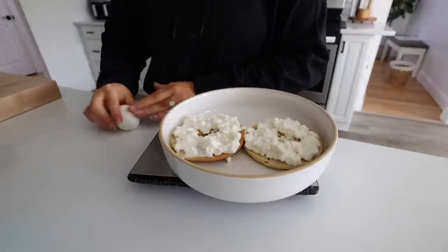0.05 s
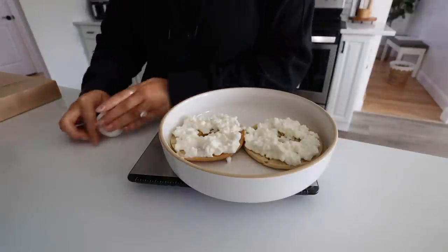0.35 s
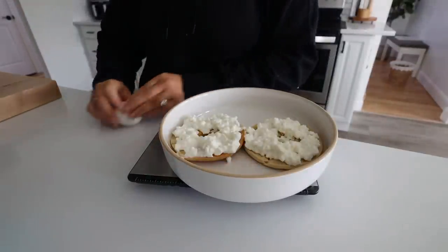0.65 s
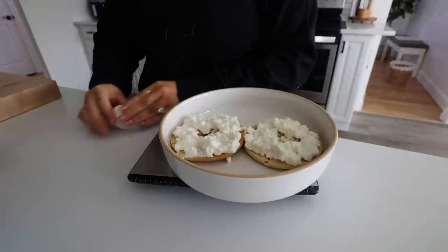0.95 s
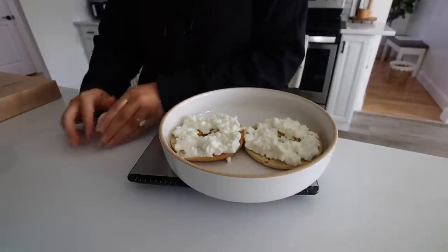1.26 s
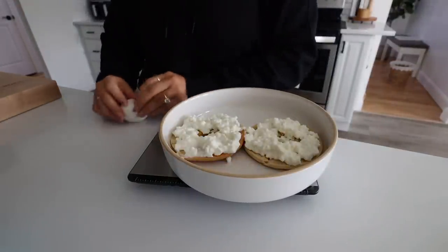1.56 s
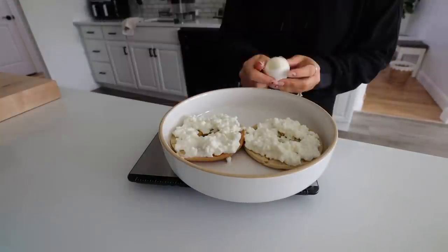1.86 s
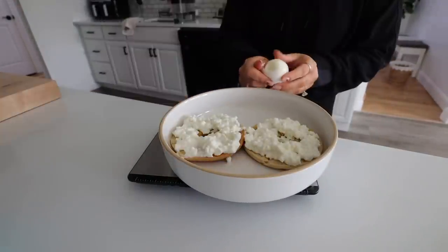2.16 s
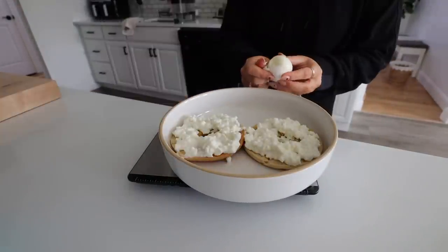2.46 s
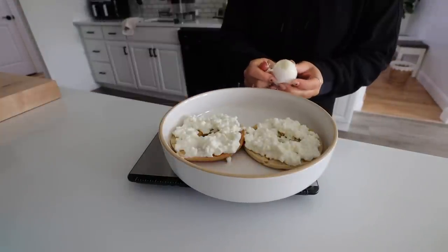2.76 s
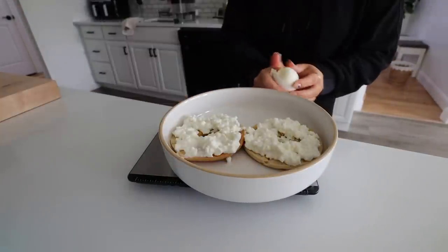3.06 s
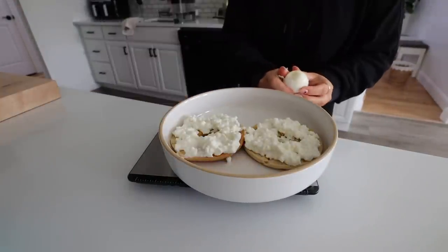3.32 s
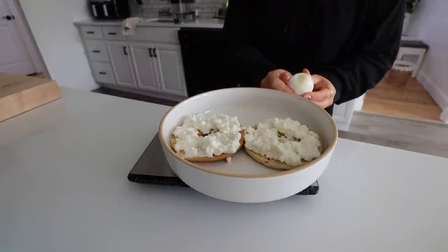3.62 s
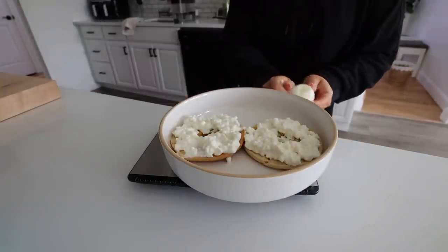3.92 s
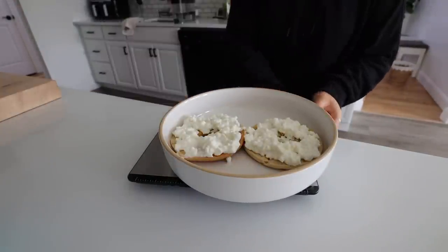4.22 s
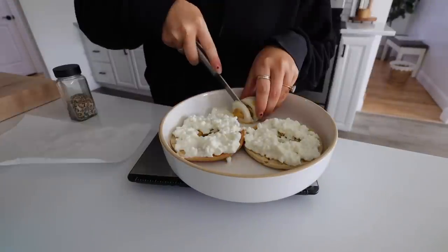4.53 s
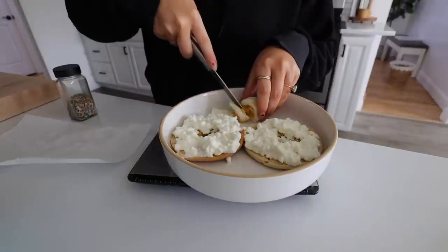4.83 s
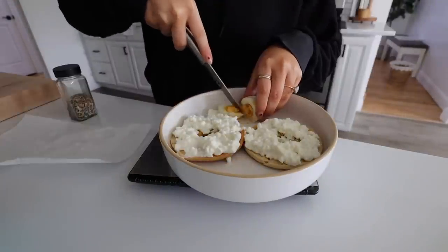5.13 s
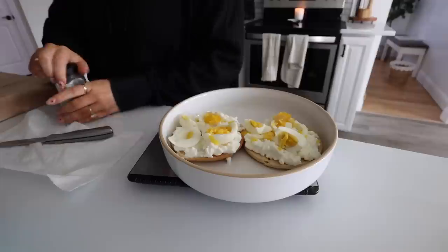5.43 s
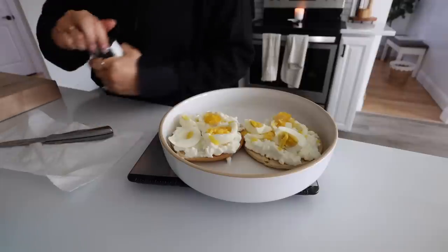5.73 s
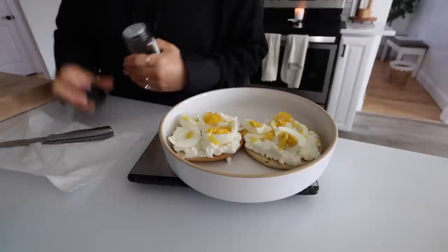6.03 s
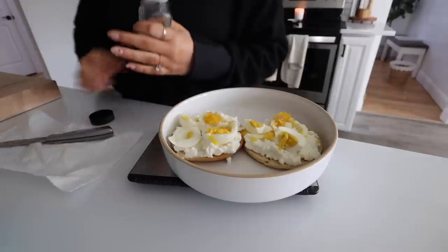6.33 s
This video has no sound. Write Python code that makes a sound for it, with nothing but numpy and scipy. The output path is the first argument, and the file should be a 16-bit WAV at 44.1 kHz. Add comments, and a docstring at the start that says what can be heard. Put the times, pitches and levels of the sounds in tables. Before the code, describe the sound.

Heard close up in a faintly humming kitchen, an eggshell crunches against the counter in two bursts, followed by light taps. Fingers pick the shell away with delicate crackles and damp little squelches. Then come several loud, ringing clinks as a knife cuts the egg against a stoneware bowl. Finally a jar is unscrewed with a brief squeak and plastic clicks, and its lid is set down hard, rattling briefly.

```python
"""Peeling and cutting a boiled egg

A boiled egg is rolled on a kitchen counter until its shell crackles, then tapped and peeled by hand.
The knife cutting it strikes a stoneware bowl; blade and bowl ring. A spice jar's lid squeaks on its
thread and is set down hard. A close stereo microphone hears it over a faint room hum."""
import sys
import numpy as np
from scipy import signal
from scipy.fft import rfft, irfft, next_fast_len
from scipy.io import wavfile
from scipy.ndimage import uniform_filter1d

SR = 44100
rng = np.random.default_rng(int(sys.argv[2]) if len(sys.argv) > 2 else 0)


def generate_wav(sig):
    """Save sig (samples, or channels by samples) to the path in sys.argv[1] as 16-bit PCM at SR."""
    pcm = np.round(np.clip(np.atleast_2d(sig).T, -1, 1) * 32767).astype(np.int16)
    wavfile.write(sys.argv[1], SR, pcm)


N = 290222

# spectrum of a small brittle snap: freq_hz, gain_db
SNAP_SPECTRUM = [(300, -39), (1500, -0.5), (2800, -11), (3800, -9), (6500, 4.5), (9000, 3), (11000, -11),
                 (14000, -8), (16000, -22)]


def amp(db):
    """Decibels to gain."""
    return 10 ** (np.asarray(db) / 20)


def unit_rms(x):
    """Scales to rms 1."""
    return x / np.sqrt(np.mean(x ** 2) + 1e-20)


def curve_at(points, hz):
    """Interpolates on a log-frequency axis."""
    freq_hz, value = np.transpose(points)
    return np.interp(np.log(hz + 1), np.log(freq_hz), value)


def add(mix, start_s, sound):
    """Mixes a sound in at start_s."""
    part = mix[..., max(round(start_s * SR), 0):][..., :sound.shape[-1]]
    part += sound[..., :part.shape[-1]]


def colour(x, spectrum, tilt_db_oct=0, size=4096):
    """Minimum-phase filter with a given spectrum, tilted above 2 kHz."""
    hz = abs(np.fft.fftfreq(size, 1 / SR))
    octaves = np.log2(1 + (hz / 2000) ** 2) / 2
    log_gain = np.log(amp(curve_at(spectrum, hz) + tilt_db_oct * octaves))
    taps = np.fft.ifft(np.exp(np.conj(signal.hilbert(log_gain)))).real
    return signal.oaconvolve(x, taps[:size // 2])[:len(x)]


def contact(spectrum, level_db, tilt_db_oct, chatter_s, chatter, size=6000):
    """One sharp push and a dying chatter of tiny contacts, in the colour of the object."""
    push = rng.standard_normal(size) * np.exp(-np.arange(size) / SR / max(chatter_s, 1e-4))
    push *= chatter / np.linalg.norm(push)
    push[0] += 1
    x = colour(push, spectrum, tilt_db_oct)
    crest = 2 * np.sqrt(uniform_filter1d(x ** 2, size=100).max())  # twice the loudest 2 ms rms
    return amp(level_db) * x / crest


def crackle(rate_hz, spread_db, size=N):
    """A random train of tiny fractures or slips of unequal strength."""
    strength = amp(spread_db * np.minimum(rng.exponential(1, size), 3))
    return strength * rng.choice([-1, 1], size) * (rng.random(size) < rate_hz / SR)


def mode(t, hz, level_db, t60_s, phase_rad=0):
    """A decaying sine."""
    return amp(level_db - 60 * t / t60_s) * np.sin(2 * np.pi * hz * t + phase_rad)


def arch(start_s, length_s, power=0.17):
    """A stroke that swells and fades: half a sine, raised to a power."""
    phase = np.clip((np.arange(N) / SR - start_s) / length_s, 0, 1)
    return np.sin(np.pi * phase) ** power


def effort(peak_s, build_s, release_s):
    """Force grows steadily until peak_s, then lets go."""
    t = np.arange(N) / SR - peak_s
    return np.clip(1 + t / build_s, 0, 1) * np.exp(-np.maximum(t, 0) / release_s)


def place(x, pan_db, lag_ms):
    """Sound from the left reaches the right channel later and weaker."""
    size = next_fast_len(N + SR // 100, True)
    delay = np.exp(-2j * np.pi * np.fft.rfftfreq(size, 1 / SR) * lag_ms / 1000)
    late = irfft(rfft(x, size) * delay, size)[:N]
    return np.array([x * amp(pan_db / 2), late * amp(-pan_db / 2)])


def diffuse(mid, side):
    """Sound from all around: mono in the bass, wide in the treble."""
    # stereo width: freq_hz, side_gain_db
    width = [(25, -30), (60, -27), (200, -15.5), (500, -6.5), (1000, -5), (2200, -4.5), (3500, 6),
             (6000, 5.5), (9000, 9.5), (14000, 9.5)]
    side = colour(side, width)
    return np.array([mid + side, mid - side])


def kitchen(x, wet_db, build_s=0.0012):
    """Reflections build up, then each band dies at its own speed."""
    # room decay: freq_hz, t60_s
    decay_times = [(150, 0.47), (600, 0.61), (2200, 0.48), (5000, 0.29), (12000, 0.029)]
    hz, t, bands = signal.stft(rng.standard_normal((2, SR * 3 // 4)), SR, nperseg=256)
    bands *= amp(-60 * t / curve_at(decay_times, hz)[:, None])
    tails = signal.istft(bands * (1 - np.exp(-t / build_s)), SR, nperseg=256)[1]
    mid, side = (signal.fftconvolve(x, tail / np.linalg.norm(tail))[:N] for tail in tails)
    return amp(wet_db) * diffuse(mid, side)


def room_tone(air_db=-46.5, loud_from_s=1.66, loud_until_s=5.68):
    """Steady air noise and the wavering hum of kitchen appliances, louder for a stretch."""
    # air noise: freq_hz, gain_db
    air_spectrum = [(20, -8), (55, -1.5), (230, 0.5), (300, -3), (410, -9.5), (620, -9.5), (1030, -14.5),
                    (2300, -16.5), (3300, -22.5), (4500, -29.5), (7000, -36.5), (12000, -53), (14000, -55),
                    (16000, -84)]
    # appliance hum: pitch_hz, base_db
    hum_tones = [(59.2, -60), (183, -67.5)]
    mid, side = (amp(air_db) * unit_rms(colour(rng.standard_normal(N), air_spectrum)) for _ in range(2))
    t, hum = np.arange(N) / SR, np.zeros(N)
    for hz, db in hum_tones:
        drift = np.interp(t, np.linspace(0, N / SR, 30), rng.standard_normal(30))
        hum += np.sqrt(2) * amp(db + 2 * drift) * np.sin(2 * np.pi * hz * t + drift[::-1] / 2)
    boost_db = np.where((t > loud_from_s) & (t < loud_until_s), 7.5, -3)
    return diffuse(mid, side) + hum * uniform_filter1d(amp(boost_db), size=2000)


def shard(spectrum, ripple_db=1.5):
    """No two fragments sound alike: a spectrum with random ripples."""
    hz, db = np.transpose(spectrum)
    return np.transpose([hz, db + ripple_db * rng.standard_normal(len(hz))])


def eggshell(hollow_db, hollow_below_hz=1000):
    """Spectrum of one crack: a shell fragment over the egg's hollow knock."""
    # cracking shell: freq_hz, gain_db
    shell_spectrum = [(100, -17.5), (450, -7), (850, 5.5), (1150, -2.5), (1750, 10), (2250, -3),
                      (3200, -3.5), (4300, -12), (6500, -7.5), (9000, -7.5), (12000, -24), (16000, -46)]
    hz, db = shard(shell_spectrum).T
    return np.transpose([hz, db + hollow_db * (hz < hollow_below_hz)])


def rolling_and_tapping(crunch_db=-9, rumble_db=-12, crumble_db=-25, crumble_t60_s=0.1):
    """The shell cracks and crumbles under the palm, then is tapped; both thump the counter."""
    # loudest cracks: start_s, level_db, thump_db, hollow_db
    cracks = [(.027, -18, -25, 8), (.090, -18, -28.5, -0.5), (.098, -21.5, -24, 7), (.125, -23, -26.5, 2),
              (.186, -19.5, -49, 3), (.206, -20, -29, 1), (0.222, -23, -36, 3), (.231, -14.5, -24, 3),
              (.278, -17.5, -30, 3), (.299, -18, -36, 3.5), (.322, -24, -31, 1), (.373, -26, -50, -7),
              (.406, -17.5, -31.5, 3), (.853, -21.5, -43, -11), (.863, -20.5, -52, -2),
              (.881, -25, -23.5, -1), (.891, -25, -28.5, -2), (.930, -21.5, -29, -2), (0.932, -18, -34, -4),
              (.964, -18.5, -34, -8), (.974, -13.5, -22, 0), (1.0113, -16, -25, -2),
              (1.074, -16.5, -30, -1), (1.1111, -21.5, -38, 2), (1.138, -22, -31, -1),
              (1.158, -18.5, -23, -2), (1.179, -21.5, -31, -2), (1.2, -28.5, -39, -3)]
    # egg tapped on the counter: start_s, level_db, tilt_db_oct, thump_db
    taps = [(1.511, -30.5, -3.5, -53), (1.612, -30.5, 2, -18), (1.788, -23.5, -0.5, -25.5)]
    # counter slab: pitch_hz, level_db, t60_s
    counter_modes = [(84, -26.5, 0.04), (154.3, 4.5, 0.061), (202.7, -3, 0.077), (266.7, -11.5, 0.092)]
    # pushes of the palm: start_s, length_s, level_db
    rolls = [(-.03, 0.1, -32.5), (0.074, 0.095, -30), (0.187, 0.055, -31.5), (0.848, 0.058, -29),
             (0.913, 0.11, -32)]
    shell, pushes, crumbling = np.zeros((3, N))
    t = np.arange(SR // 4) / SR
    for start_s, db, thump_db, hollow_db in cracks:
        tilt_db_oct = -0.1 - 0.39 * (db + 15)  # stronger cracks are duller
        add(shell, start_s, contact(eggshell(hollow_db), db, tilt_db_oct, chatter_s=0.0038, chatter=1.5))
        add(crumbling, start_s, amp(db - 60 * t / crumble_t60_s))
        add(pushes, start_s, amp([thump_db]))
    for start_s, db, tilt_db_oct, thump_db in taps:
        tap = contact(eggshell(hollow_db=5.5), db, tilt_db_oct, chatter_s=0.0048, chatter=1.43)
        add(shell, start_s, tap)
        add(pushes, start_s, amp([thump_db]))
    slab = sum(mode(t, hz, db, t60_s) for hz, db, t60_s in counter_modes)
    slab *= 1 - np.exp(-t / 0.0028)
    pressure = sum(amp(db) * arch(start_s, length_s, power=0.18) for start_s, length_s, db in rolls)
    grains = crackle(rate_hz=2200, spread_db=4.5)
    crunch = unit_rms(colour(grains, eggshell(hollow_db=-2), tilt_db_oct=-0.5))
    shell += (amp(crunch_db) * pressure + amp(crumble_db) * crumbling) * crunch
    thumps = signal.oaconvolve(pushes, slab / abs(slab).max())[:N]
    thumps += amp(rumble_db) * pressure * unit_rms(signal.oaconvolve(grains, slab)[:N])
    # the shell's room echo has less 1.8 kHz ring and top treble
    room_send = colour(shell, [(1300, 5), (1800, -2), (2400, 8.5), (7000, -2)])
    direct = place(shell, pan_db=5, lag_ms=0.053) + thumps
    return direct + kitchen(room_send, wet_db=-14) + kitchen(thumps, wet_db=-10)


def peeling(tear_db=-3, rub_db=-6):
    """Membrane tears in a fine crackle, fingers rub and slip, and shell pieces snap or rasp off."""
    # pulls on the shell: peak_s, build_s, membrane_db, finger_db
    pulls = [(1.94, 0.081, -52, -50), (2.45, 0.12, -44.5, -47.5), (2.56, 0.026, -54, -46),
             (2.65, 0.038, -50, -52), (2.98, 0.29, -59.5, -73), (3.07, 0.046, -52, -49.5),
             (3.17, 0.016, -57, -48), (3.305, 0.096, -52.5, -53), (3.43, 0.096, -55.5, -58),
             (3.66, 0.046, -46.5, -46), (3.86, 0.036, -57, -45), (4.35, 0.1, -56, -44.5)]
    # damp membrane lifting: start_s, length_s, level_db
    lifts = [(2.75, 1, -70), (3.58, 0.035, -63), (3.633, 0.039, -57)]
    # its bright crackle: freq_hz, gain_db
    sticky_spectrum = [(2000, -29), (7000, 0), (10000, -8), (12000, -3), (14500, -6), (16000, -17.5)]
    # fingers on shell: freq_hz, gain_db
    rub_spectrum = [(300, -34), (1200, -4), (2200, 4), (2800, -4.5), (3600, -3), (4800, -10.5), (9000, -22)]
    # pieces snapping off: start_s, level_db
    breaks = [(2.257, -45), (2.404, -44), (2.448, -28), (2.629, -39.5), (2.722, -39.5), (2.977, -35),
              (2.986, -30.5), (3.0597, -34.5), (3.3123, -32), (3.508, -40.5), (3.591, -36.5), (3.639, -35),
              (3.647, -43), (3.8029, -40.5)]
    # wet fingers on bare egg: start_s, level_db, decay_s, pitch_hz
    slips = [(2.45, -32, 0.013, 2020), (3.059, -31, 0.008, 2700), (3.413, -36, 0.013, 2460),
             (3.662, -29, 0.017, 2120), (3.848, -31.5, 0.029, 2240), (3.918, -33, 0.018, 2230),
             (3.998, -34, 0.03, 2070), (4.122, -29, 0.024, 2050), (4.219, -31, 0.015, 2120),
             (4.27, -34.5, 0.034, 2220), (4.333, -31, 0.01, 2190)]
    # shell strip rasping away: start_s, length_s, level_db, first_hz, last_hz
    rasp = [(2.34, 0.11, -47.5, 3300, 2590)]
    tearing, rubbing, snaps = np.zeros((3, N))
    for peak_s, build_s, membrane_db, finger_db in pulls:
        force = effort(peak_s, build_s, release_s=0.03)
        tearing += amp(membrane_db) * force
        rubbing += amp(finger_db) * force
    fractures = [crackle(rate_hz=70, spread_db=4.5) for _ in range(6)]
    fibres = sum(colour(train, shard(SNAP_SPECTRUM), tilt_db_oct=-3) for train in fractures)
    membrane = amp(tear_db) * tearing * unit_rms(fibres)
    lifting = sum(amp(db) * arch(start_s, length_s) for start_s, length_s, db in lifts)
    membrane += lifting * unit_rms(colour(crackle(rate_hz=500, spread_db=3.5), sticky_spectrum))
    fingers = amp(rub_db) * rubbing * unit_rms(colour(crackle(rate_hz=900, spread_db=3), rub_spectrum))
    for start_s, db in breaks:
        snap = contact(shard(SNAP_SPECTRUM), db, tilt_db_oct=1, chatter_s=0.0008, chatter=0.7)
        add(snaps, start_s, snap)
    for start_s, db, decay_s, pitch_hz in slips:
        add(fingers, start_s, finger_slip(db, decay_s, pitch_hz))
    hands = membrane + fingers + stick_slip(rasp, width_hz=1300)
    room_send = hands + amp(-1) * snaps
    return place(hands + snaps, pan_db=2, lag_ms=-0.025) + kitchen(room_send, wet_db=-9)


def resonate(x, hz, width_hz):
    """A resonance whose centre follows the curve hz."""
    carrier = np.exp(2j * np.pi * np.cumsum(hz) / SR)
    pole = np.exp(-np.pi * width_hz / SR)
    return 2 * (carrier * signal.lfilter([1 - pole], [1, -pole], x / carrier)).real


def stick_slip(glides, width_hz):
    """Tiny slips feed a gliding resonance: a rasp if wide, a squeak if narrow."""
    out = np.zeros(N)
    for start_s, length_s, db, first_hz, last_hz in glides:
        pitch_hz = np.interp(np.arange(N) / SR, [start_s, start_s + length_s], [first_hz, last_hz])
        slips = crackle(rate_hz=2900, spread_db=2)
        tone = resonate(resonate(slips, pitch_hz, width_hz), pitch_hz, 2 * width_hz)
        out += amp(db) * arch(start_s, length_s) * unit_rms(tone)
    return out


def finger_slip(level_db, decay_s, pitch_hz):
    """A wet fingertip lets go at once and chatters to rest."""
    # squelch, its 2150 Hz peak moved to pitch_hz below: freq_hz, gain_db
    squelch = [(500, -22), (1600, -10), (2150, 6), (2500, -3), (2900, -12.5), (3600, -8.5), (5000, -27),
               (12000, -35.5)]
    t = np.arange(SR // 4) / SR
    spectrum = [(hz * pitch_hz / 2150, db) for hz, db in squelch]
    slips = crackle(rate_hz=1200, spread_db=2.5, size=len(t))
    chatter = unit_rms(colour(slips, spectrum)) / np.pi  # peaks near 1
    return amp(level_db) * chatter * np.minimum(t / 0.002, 1) * np.exp(-t / decay_s)


def knife_on_bowl(chime_hz=3520, ping_hz=4940, uneven_db=2, grit_db=-3, lag_ms=0.048, stop_s=5.297):
    """The blade knocks, rebounds and drags on the bowl; both ring, and all stops short at stop_s."""
    # blows, varying with grip and landing place: start_s, knock_db, tilt_db_oct, ring_db,
    # blade_db, blade_hz, thud_db, thud_hz, chime_db, ping_db
    blows = [(4.5347, -2.5, -3.5, -23.5, -19, 2244, -20, 648, 2, -1),
             (4.539, -5, 2, -26, -25, 2216, -22, 559, 4.5, -1),
             (4.6008, -15, 0.5, -37, -33, 2280, -41.5, 630, 7, 1),
             (4.816, -1, -2.5, -19, -12, 2326, -22, 623, 2, 4.5),
             (4.8203, -6.5, -2, -23, -28, 2322, -35, 654, -4, 1),
             (4.876, -13, 6.5, -37, -25, 2280, -24, 556, 8, -1),
             (5.004, -2.5, 5, -18.5, -14.5, 2336, -20.5, 642, 0, -7),
             (5.0099, -4, 6, -39, -40, 2330, -42, 684, 4, 0),
             (5.129, -23, 5.5, -35, -22.5, 2232, -28, 672, 4, 1),
             (5.153, -23, -0.5, -33, -18.5, 2232, -42, 658, 1.5, 6)]
    # stoneware bowl: pitch_hz, level_db, t60_s
    bowl_modes = [(649, -15, 0.08), (1166, -5.5, 0.13), (1418, -11.5, 0.088), (1640, -14, 0.15),
                  (1865, -5.5, 0.061), (2540, -14, 0.17), (2160, -13, 0.087), (2270, -1.5, 0.2),
                  (3023, -18, 0.14), (3500, -20.5, 0.26), (3543, -16.5, 0.21), (4933, -16, 0.076),
                  (4920, -14, 0.13), (6570, -20, 0.058), (6920, -27, 0.1), (8560, -22, 0.065)]
    # blade hitting stoneware: freq_hz, gain_db
    knock_spectrum = [(150, -39), (430, -13.5), (620, -0.5), (900, -2), (1200, 7), (1550, 0.5), (1820, 6),
                      (2400, 2.5), (2750, -12.5), (3400, -5), (4000, -27), (6500, -25.5), (9000, -36.5),
                      (16000, -83)]
    # blade dragging on glaze: peak_s, build_s, level_db
    drags = [(4.653, 0.032, -40), (4.871, 0.012, -33.5), (5.05, 0.048, -33), (5.159, 0.054, -33),
             (5.249, 0.017, -39.5), (5.29, 0.015, -45)]
    # slips are softer than blows: freq_hz, gain_db
    drag_spectrum = [(2500, -0.5), (5000, -8.5), (8000, -13)]
    knocks, blade, ring = np.zeros(N), np.zeros(N), np.zeros((2, N))
    t = np.arange(SR // 2) / SR
    hz, mode_db, t60_s = np.transpose(bowl_modes)[:, :, None]
    onset = 1 - np.exp(-(t / 0.0008) ** 2)
    in_chime, in_ping = abs(hz - chime_hz) < 200, abs(hz - ping_hz) < 200  # two clearest mode pairs
    lead_rad = np.pi * hz * lag_ms / 1000
    for (start_s, knock_db, tilt_db_oct, ring_db,
         blade_db, blade_hz, thud_db, thud_hz, chime_db, ping_db) in blows:
        add(knocks, start_s, contact(knock_spectrum, knock_db, tilt_db_oct, chatter_s=.005, chatter=.7))
        add(knocks, start_s, onset * mode(t, thud_hz, thud_db, t60_s=0.06))
        # chatter against the glaze roughens the blade's ring
        wobble_rad = 0.35 * signal.resample(rng.standard_normal(70), len(t))
        add(blade, start_s, onset * mode(t, blade_hz, blade_db, t60_s=0.16, phase_rad=wobble_rad))
        # modes leave the rim in lobes, so the channels hear them out of step
        lobes_rad = np.array([lead_rad, -lead_rad]) + 0.61 * rng.standard_normal((2, len(hz), 1))
        favoured_db = chime_db * in_chime + ping_db * in_ping + tilt_db_oct * np.log2(hz / 2300)
        struck_db = mode_db + ring_db + favoured_db + uneven_db * rng.standard_normal(hz.shape)
        phase_rad = 2 * np.pi * rng.random(hz.shape) + lobes_rad
        clink = onset * mode(t, hz, struck_db, t60_s, phase_rad).sum(1)
        add(ring, start_s, clink)
    # dragging feeds the last clink's modes with tiny slips
    slips = crackle(rate_hz=1700, spread_db=5)
    pressure = sum(amp(db) * effort(peak_s, build_s, release_s=0.028) for peak_s, build_s, db in drags)
    scrape = signal.oaconvolve(colour(slips, drag_spectrum)[None], clink, axes=1)[:, :N]
    ring += pressure * unit_rms(scrape) + place(blade, pan_db=3, lag_ms=0.085)
    knocks += amp(grit_db) * pressure * unit_rms(colour(slips, knock_spectrum))
    gate = uniform_filter1d(1.0 * (np.arange(N) / SR < stop_s), size=200)
    direct = place(knocks, pan_db=2, lag_ms=0.034) + ring
    return gate * (direct + kitchen(knocks + ring[0], wet_db=-14.5))


def thin_ring():
    """A faint high tone lingers for one second while the jar is picked up."""
    # lingering tone: start_s, level_db, pitch_hz, t60_s
    tones = [(5.301, -64.5, 4010, 7)]
    out, t = np.zeros(N), np.arange(SR) / SR
    for start_s, db, hz, t60_s in tones:
        add(out, start_s, mode(t, hz, db, t60_s))
    return out


def jar_opening(grit_db=-9):
    """The lid squeaks and scrapes round its thread and clicks free, among soft bumps and ticks."""
    # lid on its thread: start_s, length_s, level_db, first_hz, last_hz
    squeaks = [(5.629, 0.006, -39, 2190, 2120), (5.652, 0.032, -27.5, 2210, 1910)]
    # plastic lid on glass jar: start_s, level_db, tilt_db_oct, chatter_s
    clicks = [(5.667, -19.5, -2.5, 0.015), (5.841, -26.5, 3.5, 0.0049), (5.85, -24, -8, 0.0043),
              (5.86, -25, -7, 0.0057), (5.889, -17.5, 3, 0.0013), (5.893, -11.5, 5.5, 0.0044)]
    # lid plastic: freq_hz, gain_db
    plastic = [(200, -18), (700, -5.5), (1100, -8), (1550, 0.5), (2100, 4), (2700, 2), (3400, -16.5),
               (4400, -10.5), (8500, -23), (12000, -53), (16000, -83)]
    # light handling ticks: start_s, level_db
    touches = [(5.443, -28), (6.490, -38.5)]
    # hands and things bumping the counter: start_s, level_db, pitch_hz, t60_s
    bumps = [(1.512, -33, 900, 0.019), (5.371, -24.5, 914, 0.26), (5.848, -27.5, 270, 0.12),
             (5.889, -28.5, 329, 0.11), (5.915, -32, 520, 0.077)]
    knocks, ticks = np.zeros((2, N))
    thread = stick_slip(squeaks, width_hz=240)
    turning = sum(amp(db + grit_db) * arch(start_s, length_s) for start_s, length_s, db, _, _ in squeaks)
    thread += turning * unit_rms(colour(crackle(rate_hz=2000, spread_db=2), plastic, tilt_db_oct=-0.5))
    for start_s, db, tilt_db_oct, chatter_s in clicks:
        add(knocks, start_s, contact(plastic, db, tilt_db_oct, chatter_s, chatter=2.04))
    for start_s, db in touches:
        add(ticks, start_s, contact(SNAP_SPECTRUM, db, tilt_db_oct=-9, chatter_s=0.0039, chatter=1.4))
    for start_s, db, hz, t60_s in bumps:
        hollow = [(hz / 3, -22), (hz / 1.26, -11), (hz, 0),
                  (hz * 1.04, -11), (hz * 2.45, -22), (hz * 20, -85)]
        add(knocks, start_s, contact(hollow, db, 0, chatter_s=t60_s / np.log(1000), chatter=2.06))
    room_send = knocks + amp(-8) * thread  # the squeak echoes less than the knocks
    return place(knocks + ticks + thread, pan_db=5, lag_ms=0.073) + kitchen(room_send, wet_db=-12)


def lid_landing(land_s=6.1472, level_db=6):
    """The lid hits the counter flat: one hard clack that fills the room, and a brief rattle."""
    # lid on counter: freq_hz, gain_db
    lid_spectrum = [(200, -91), (600, -29.5), (1200, -20), (1700, -6.5), (2300, 0), (2800, -10.5),
                    (3400, -33.5), (4800, -24.5), (6000, -15), (8000, -16.5), (12000, -22), (16000, -59)]
    # sound sent sideways, the top treble being beamed at the microphone: freq_hz, gain_db
    sideways = [(1150, -3), (1600, 0), (2100, -8), (2450, 2.5), (2850, -1.5), (3400, 7.5), (4650, 7.5),
                (5000, -18), (6400, -17), (12000, -15)]
    # lid settling: start_s, level_db
    bounces = [(6.1527, -12), (6.193, -16), (6.198, -16), (6.203, -18), (6.213, -16), (6.224, -18)]
    clack, rattle = np.zeros((2, N))
    add(clack, land_s, contact(lid_spectrum, level_db, 0, chatter_s=0.003, chatter=0.2))
    for start_s, db in bounces:
        add(rattle, start_s, contact(lid_spectrum, db, 0, chatter_s=0.0041, chatter=1.5))
    direct = place(clack, pan_db=2.5, lag_ms=0.052)
    rocking = place(colour(rattle, sideways), pan_db=1, lag_ms=0.047)
    return direct + rocking + kitchen(colour(clack, sideways), wet_db=-13.5, build_s=0.14)


def scene():
    """The work at the counter, over the room tone."""
    egg = rolling_and_tapping() + peeling() + knife_on_bowl()
    return egg + thin_ring() + jar_opening() + lid_landing() + room_tone()


def record(dry):
    """The hardest blows clip the input; a low-pass at 15.9 kHz follows."""
    lowpass = signal.firwin(511, 15900, window=("kaiser", 9), fs=SR)
    return signal.oaconvolve(np.clip(dry, -1, 1), lowpass[None], "same")


dry = scene()
out = record(dry)
generate_wav(out)
```